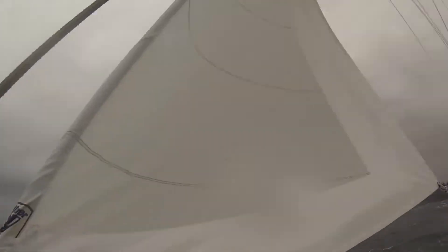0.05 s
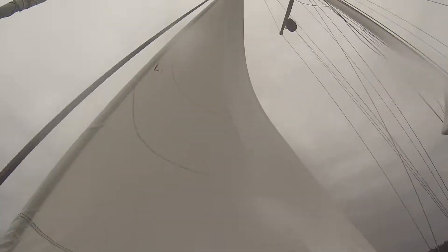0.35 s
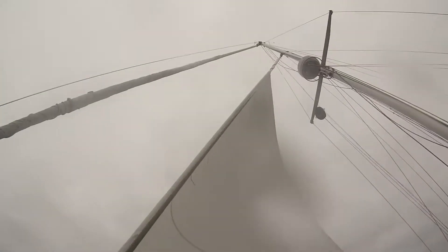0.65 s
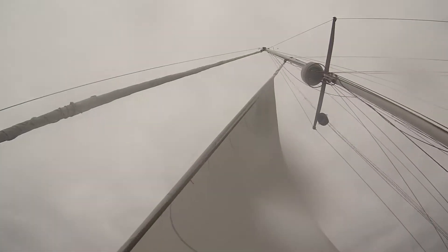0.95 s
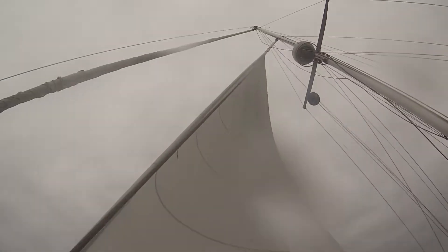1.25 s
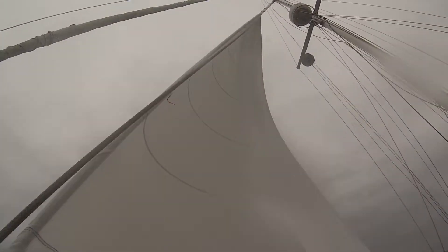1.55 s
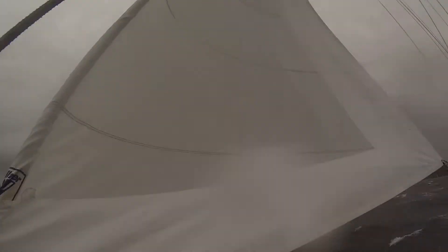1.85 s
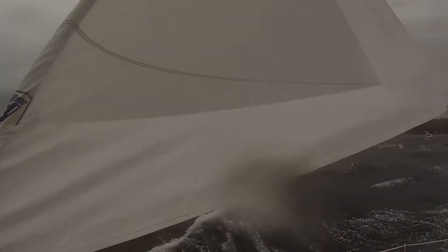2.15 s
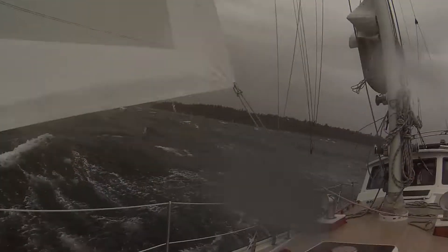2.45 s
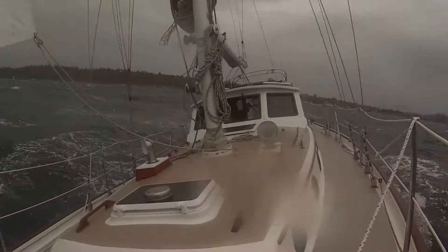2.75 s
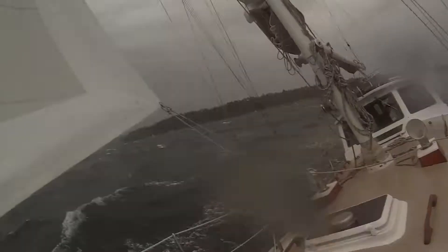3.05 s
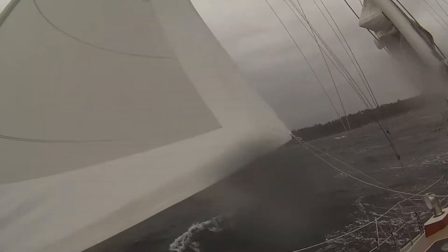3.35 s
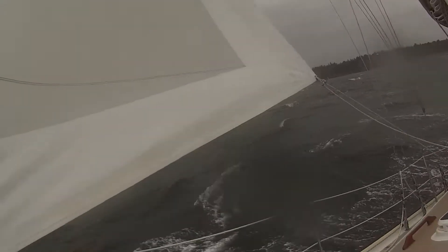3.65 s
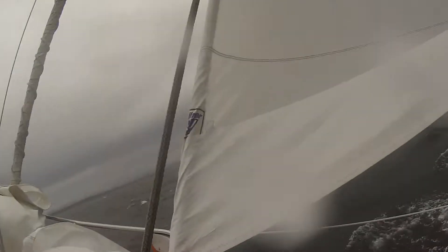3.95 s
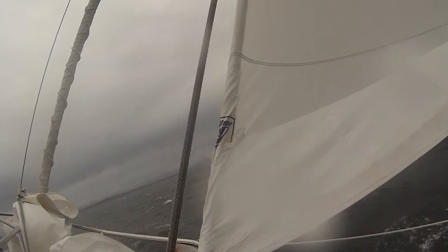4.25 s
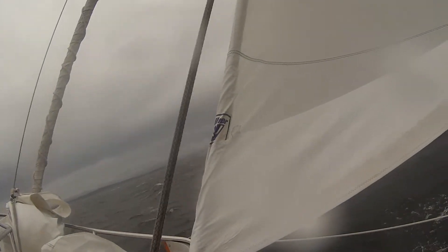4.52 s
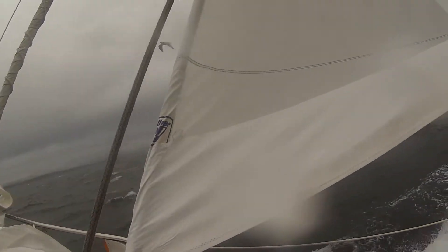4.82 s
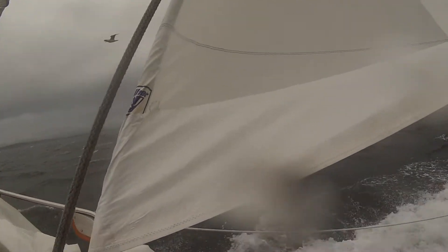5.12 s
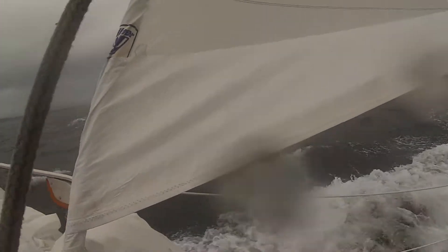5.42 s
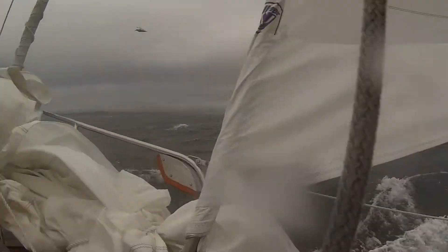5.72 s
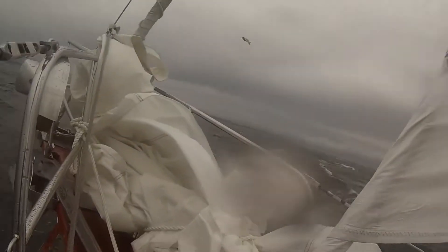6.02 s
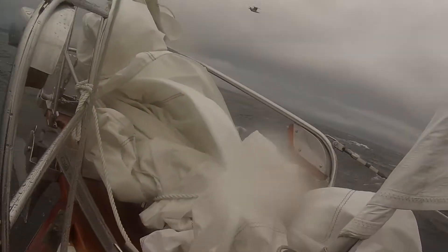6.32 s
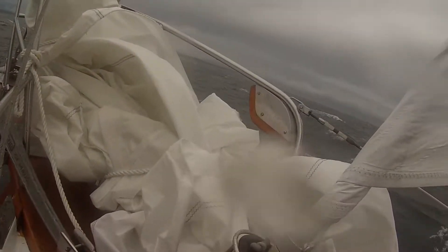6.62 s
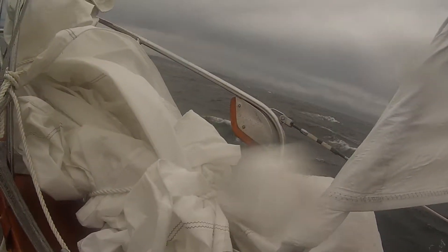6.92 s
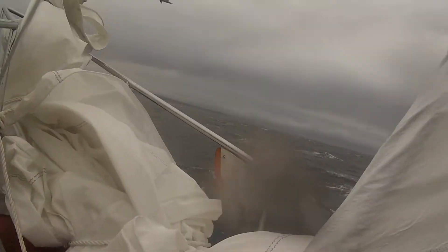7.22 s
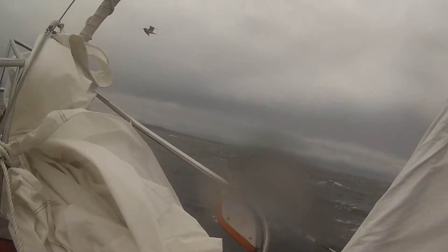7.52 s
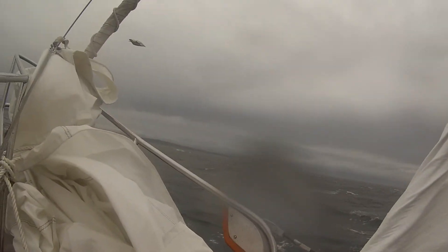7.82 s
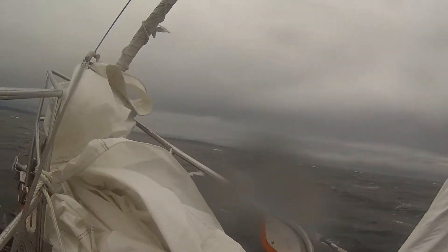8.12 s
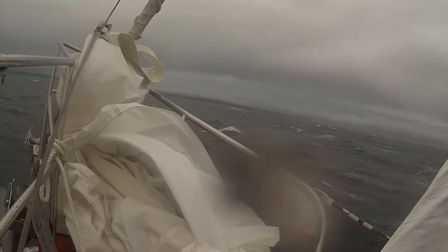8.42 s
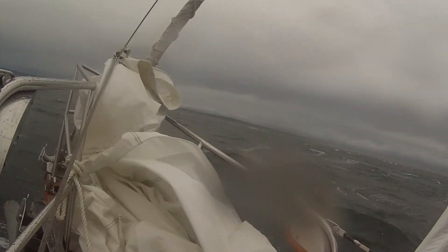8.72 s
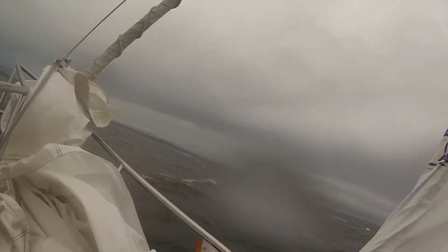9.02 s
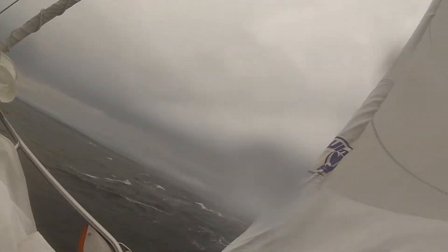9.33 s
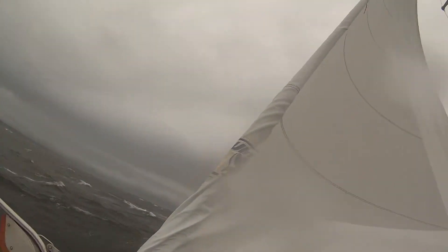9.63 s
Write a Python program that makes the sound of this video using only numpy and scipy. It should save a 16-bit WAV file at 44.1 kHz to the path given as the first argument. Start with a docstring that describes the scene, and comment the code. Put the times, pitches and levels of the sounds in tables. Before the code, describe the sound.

Strong wind buffets and booms on a small microphone aboard a sailing boat, with faint water wash and ticks of spray.

```python
"""Strong wind batters a small camera in a waterproof case on the foredeck of a sailing boat.
Eddies rock, thump and hiss along the case, and its edges whistle as they cut the air.
Behind the wind, the bow wave washes along the hull and drops of spray tick on the plastic shell.
Everything is heard through the case, which booms in the bass and rings hollow in the treble."""
import sys
import numpy as np
from scipy import signal
from scipy.fft import rfft, irfft, next_fast_len
from scipy.io import wavfile
from scipy.ndimage import uniform_filter1d

SR = 44100
rng = np.random.default_rng(int(sys.argv[2]) if len(sys.argv) > 2 else 0)


def output_pcm(signal):
    """Save a mono or channel-first signal as 16-bit PCM at the path in sys.argv[1].

    Samples are clipped to [-1, 1] before scaling.
    """
    pcm = np.clip(np.atleast_2d(signal).T, -1, 1) * 32767
    wavfile.write(sys.argv[1], SR, np.round(pcm).astype(np.int16))


N = 430857
TIME = np.arange(N) / SR


def undb(db):
    """Decibels to gain."""
    return np.exp(np.asarray(db) * (np.log(10) / 20))


def unit(x):
    """Scale to an rms of one."""
    return x / np.sqrt(np.mean(x ** 2))


def fader(points):
    """A level curve in dB, drawn in straight lines between (seconds, dB) points."""
    return np.interp(TIME, *np.transpose(points))


def walk(rate):
    """A smooth random wander with an rms of one and about `rate` turns a second."""
    size = int(SR / rate)
    held = rng.standard_normal(N // 50)[np.arange(N) // size]
    return unit(uniform_filter1d(held, size))


def even(x, span_s):
    """Hold a noise to a constant strength over the given span."""
    return x / np.sqrt(uniform_filter1d(x ** 2, int(span_s * SR)) + 1e-9)


def add(out, start, sound):
    """Mix a sound in at a start time in seconds."""
    i = max(int(start * SR), 0)
    out[i:i + len(sound)] += sound[:N - i]


def swells(rows, rise_s, fall_s):
    """Summed power of swells (start, length, dB) that rise, hold and die away."""
    power = np.zeros(N)
    for start, length, db in rows:
        t = TIME[:int((length + 1) * SR)]
        attack = np.minimum(t / rise_s, 1)
        release = np.exp(-np.maximum(t - length, 0) / fall_s)
        add(power, start, (undb(db) * attack * release) ** 2)
    return power


def colour_db(colour, hz):
    """An EQ curve read at any frequencies, rolling off 30 dB per octave past its ends."""
    points_hz, db = np.transpose(colour)
    octave, known = np.log2(np.maximum(hz, 1)), np.log2(points_hz)
    return np.interp(octave, known, db) - 30 * abs(octave - np.clip(octave, known[0], known[-1]))


# The hollow ring of the case. Each row: centre in Hz, width in Hz, boost in dB.
CASE_RESONANCES = [(747, 82, 2), (1534, 300, 7), (2017, 550, 5), (3006, 55, 6), (3420, 130, 3.5),
                   (5560, 410, 3), (6670, 290, 3), (7400, 120, 4), (11470, 680, 2.5)]
def case_db(hz):
    """How much the resonances of the case lift each frequency."""
    return sum(db / (1 + (2 * (hz - centre) / width) ** 2) for centre, width, db in CASE_RESONANCES)


def noise(colour):
    """Noise of a given colour, heard through the case."""
    size = next_fast_len(N, real=True)
    hz = np.arange(size // 2 + 1) * SR / size
    eq = undb(colour_db(colour, hz) + case_db(hz))
    return unit(irfft(rfft(rng.standard_normal(size)) * eq, size)[:N])


# The bright tone of a splash. Each row: frequency in Hz, relative level in dB.
SPLASH_COLOUR = [(900, -49), (1500, -6.5), (2400, -0.5), (3050, -24), (3500, 1), (3900, -1), (4400, -2.5),
                 (5000, 0), (5900, -5.5), (6400, -3), (7300, -4), (8400, -6), (10200, -12), (11200, -14.5),
                 (12400, -18), (13600, -16), (15500, -36)]
def splash(ping_hz, width_hz, lift_db, fade_s=0.011, size=512):
    """A drop bursts on the case: a sharp click with one ping and its own random ripples of tone."""
    hz = np.arange(size // 2 + 1) * SR / size
    jitter = rng.standard_normal(len(hz))
    ripple_db = 3 * unit(uniform_filter1d(uniform_filter1d(jitter, size=7), size=5))
    ping_db = lift_db / (1 + (2 * (hz - ping_hz) / width_hz) ** 2)
    dull_db = 7 * np.log2(np.maximum(hz / (1.7 * ping_hz), 1))  # larger, lower drops carry less treble
    eq = undb(colour_db(SPLASH_COLOUR, hz) + case_db(hz) + ripple_db + ping_db - dull_db)
    cepstrum = irfft(np.log(eq))
    pulse = irfft(np.exp(rfft(2 * cepstrum[:size // 2], size)))  # minimum phase: the tightest attack
    return pulse / abs(pulse).max() * np.exp(-(TIME[:size] / fade_s) ** 2)


def mist(hiss_gain, count=36):
    """Fine droplets tick faintly and high at random moments, more strongly in the gusts."""
    out = np.zeros(N)
    for when, size in rng.random((count, 2)):
        strength = np.sqrt(hiss_gain[int(when * N)]) * undb(-31 + 10 * size ** 2)
        add(out, when * N / SR, strength * splash(ping_hz=11500, width_hz=3000, lift_db=21))
    return out


# The foamy tone of the wash. Each row: frequency in Hz, relative level in dB.
FOAM_COLOUR = [(400, -5), (900, -18), (1250, -15.5), (1530, -3), (1820, -21), (2220, -5), (3000, -20.5),
               (3600, -14), (4080, -17), (4950, -15), (5850, -24.5), (6330, -16), (6900, -24),
               (7350, -20.5), (8600, -27), (9300, -26.5), (10100, -32.5), (11200, -31.5), (15000, -45)]
# Waves washing along the hull. Each row: start in seconds, length in seconds, level in dB.
WAVES = [(.62, 0.77, -39.5), (4.53, 0.22, -45), (4.68, 0.65, -48.5), (5.85, 0.75, -49.5)]
def bow_wave(churn_db=-53.5, note_hz=1468, width_hz=167, drift_hz=22):
    """The bow wave churns steadily and swells as the boat meets each wave; its hollow note wavers."""
    strength = np.sqrt(undb(churn_db) ** 2 + swells(WAVES, rise_s=0.17, fall_s=0.16))
    lowpass = signal.butter(2, width_hz / 2, fs=SR, output="sos")
    slow_noise = signal.sosfilt(lowpass, rng.standard_normal((2, N)))
    phase = 2 * np.pi * np.cumsum(note_hz + drift_hz * walk(rate=11)) / SR
    band = slow_noise[0] * np.cos(phase) + slow_noise[1] * np.sin(phase)
    note = unit(band * undb(0.8 * walk(rate=8.8)))
    wash = undb(-1.5) * noise(FOAM_COLOUR) + undb(-5.5) * note
    return wash * strength * undb(walk(rate=30))


# The plastic tick of the shell. Each row: multiple of the ring pitch, relative level in dB,
# seconds to fall by 60 dB.
SHELL_MODES = [(.87, 9, 0.0081), (1.0, 16, 0.0065), (1.12, -11, 0.024), (1.22, 11, 0.0095),
               (1.85, -9, 0.005), (2.36, -9, 0.011), (2.62, -7, 0.023)]
def shell_ring(ring_hz):
    """The struck shell rings briefly; neighbouring modes swing opposite ways, softening the attack."""
    t = TIME[:SR // 20]
    scatter_db = rng.standard_normal(len(SHELL_MODES))  # each spot favours other modes
    ring = np.zeros(len(t))
    for k, (ratio, db, t60) in enumerate(SHELL_MODES):
        mode = np.sin(2 * np.pi * ring_hz * ratio * t) * np.exp(-np.log(1000) * t / t60)
        ring += (-1) ** k * undb(db + scatter_db[k]) * mode
    return ring / abs(ring).max()


# Drops hitting the shell. Each row: start in seconds, splash level in dB, ping pitch in Hz,
# ping boost in dB, ring level in dB, ring pitch in Hz.
DROPS = [(0.5374, -12, 11800, 8, -11, 1800), (0.617, -21, 5040, 14, -16.5, 1980),
         (0.8613, -18.5, 11000, 14, -25, 2000), (1.5376, -17, 4960, 11, -21, 2150),
         (2.7862, -26, 4220, 13, -28.5, 1850), (2.858, -36, 4400, 16, -37, 1900),
         (2.946, -31, 5000, 4, -30, 1920), (3, -30.5, 5200, 8, -40, 1900),
         (3.055, -18.5, 4260, 2, -39, 1700), (3.19, -38, 5000, 8, -48, 1900),
         (3.417, -51, 5000, 10, -40, 1740), (4.0354, -12.5, 7900, 7.5, -15.5, 2070),
         (5.867, -21.5, 2410, 22, -12, 1260), (5.869, -36, 3300, 8, -13.5, 2010),
         (6.397, -16, 4950, 17, -4, 1860), (6.679, -28, 4900, 10, -35, 2000),
         (6.9008, -20, 7800, 8, -33, 1880), (7.4555, -26, 3640, 10, -36, 1890),
         (7.5053, -23, 7400, 5, -28, 1880), (7.9794, -18, 5300, 5, -23, 1980),
         (8.082, -33, 11400, 5, -42, 1900), (8.2138, -18.5, 11000, 14, -39, 1750),
         (8.3556, -28, 5100, 9, -23, 1930), (8.7571, -25, 11200, 19, -26, 1850),
         (9.0553, -30, 11700, 2, -30, 1900), (9.622, -13.5, 5000, 10, -18.5, 1950)]
def spray():
    """Each drop splashes sharply and rings the shell at a pitch set by where it lands."""
    out = np.zeros(N)
    for start, splash_db, ping_hz, ping_db, ring_db, ring_hz in DROPS:
        drop = undb(ring_db) * shell_ring(ring_hz)
        add(drop, 0, undb(splash_db) * splash(ping_hz, width_hz=0.13 * ping_hz, lift_db=ping_db))
        # the small stiff shell radiates little below its ring
        low_cut = signal.butter(5, 0.66 * ring_hz, "high", fs=SR, output="sos")
        add(out, start, signal.sosfilt(low_cut, drop))
    return out


# Air resonances of the case. Each row: pitch in Hz, width in Hz, relative level in dB.
WHISTLE_MODES = [(2370, 690, 2), (4350, 290, -13.5), (4900, 510, -7.5), (5500, 400, -22), (6340, 450, -16),
                 (7330, 520, -24), (8240, 700, -25)]
# Spells when an edge cuts the wind. Each row: start in seconds, length in seconds,
# whistle level in dB, whistle tilt in dB per octave, hiss level in dB.
EDGE_SPELLS = [(0, 0.17, -36, 3, -50), (0.161, 0.17, -42, -0.5, -47.5), (0.328, 0.14, -45.5, -4, -50),
               (0.452, 0.093, -41.5, -1, -43), (0.543, 0.21, -41.5, 2, -35.5),
               (0.764, 0.88, -48, -1.5, -54), (1.094, 0.37, -44.5, 2, -36.5), (1.487, 0.12, -41, 0, -45),
               (9.085, 0.22, -51, -1, -54), (9.185, 0.11, -46.5, 3, -55), (9.29, 0.17, -56, -1, -52),
               (9.29, 0.28, -56, 8, -64)]
EDGE_RISE_S, EDGE_FALL_S = 0.052, 0.012
def whistle(pivot_hz=4900, wander_db=0.5):
    """Hollow whistles come up when the case turns its edge to the wind; each wavers on its own."""
    out = np.zeros(N)
    for hz, width, mode_db in WHISTLE_MODES:
        band = signal.iirpeak(hz, hz / width, fs=SR)
        tone = unit(signal.lfilter(*band, signal.lfilter(*band, rng.standard_normal(N))))
        octaves = np.log2(hz / pivot_hz)
        spells = [(start, length, db + tilt * octaves) for start, length, db, tilt, _ in EDGE_SPELLS]
        strength = np.sqrt(swells(spells, EDGE_RISE_S, EDGE_FALL_S))
        out += tone * strength * undb(mode_db + wander_db * walk(rate=36))
    return out


# The sub-bass weight of the wind. Each row: frequency in Hz, relative level in dB.
RUMBLE_COLOUR = [(17, -6), (25, -10.5), (35, -5), (47, 1.5), (55, -6), (67, -12), (88, -24.5), (150, -47)]
# The depth of the wind's slow pressure swings. Each row: time in seconds, level in dB.
RUMBLE_FADER = [(0, -29), (1.2, -33), (1.4, -43), (1.68, -33), (1.8, -19.5), (2.45, -29.5), (3.15, -25),
                (3.35, -32.5), (3.6, -28.5), (4.2, -24.5), (5.1, -27), (6.1, -30.5), (9.3, -33),
                (9.77, -20)]
# The low boom of the case. Each row: frequency in Hz, relative level in dB.
BOOM_COLOUR = [(32, -28), (43, -2), (48, 2.5), (54, -6.5), (68, -24.5)]
# Large eddies rolling past. Each row: time of the peak in seconds, level in dB.
SURGES = [(.18, -16.5), (1.18, -24.5), (1.86, -16), (1.925, -14), (2.06, -22), (2.27, -20), (2.65, -26),
          (2.9, -25), (3.2, -21), (3.67, -18), (3.88, -21), (3.98, -18), (4.2, -21.5), (4.86, -17),
          (5.405, -17), (5.58, -18.5), (5.77, -21), (6.45, -29), (6.7, -22), (6.92, -24), (7.82, -24),
          (8.22, -25.5)]
def rumble(wander_db=3.5, surge_width_s=0.03):
    """Eddies rock the case; the largest make it boom for a few cycles at its low resonance."""
    swing = undb(fader(RUMBLE_FADER) + wander_db * walk(rate=16))
    rocking = even(noise(RUMBLE_COLOUR), span_s=0.058) * swing
    surge_power = sum(undb(db) ** 2 * np.exp(-((TIME - peak) / surge_width_s) ** 2)
                      for peak, db in SURGES)
    boom = even(noise(BOOM_COLOUR), span_s=0.041) * np.sqrt(surge_power)
    return rocking + boom


# Single hard thumps of air. Each row: start in seconds, level in dB, decay time in seconds,
# puff trim in dB on top of that level.
SLAMS = [(0.137, -17.5, 0.017, -19), (2.987, -24, 0.011, -13), (3.05, -30, 0.013, -5),
         (3.82, -23, 0.016, -17.5), (3.929, -18.5, 0.0082, -23), (3.994, -26.5, 0.006, -3.5),
         (4.165, -28.5, 0.017, -11.5), (4.84, -29.5, 0.018, -11), (5.069, -33, 0.015, -9),
         (5.304, -25, 0.02, -11.5), (5.342, -30, 0.0048, -12), (5.389, -26, 0.014, -10.5),
         (5.586, -30, 0.022, -6.5), (5.775, -33, 0.013, -6), (6.603, -13.5, 0.0053, -12),
         (6.896, -27, 0.012, -11), (9.013, -29.5, 0.011, -0.5), (9.358, -29, 0.013, -18)]
def slams(rise_s=0.0032):
    """An eddy hits the case square on: a boom with a short rough puff."""
    boom_gain, puff_gain, t = np.zeros(N), np.zeros(N), TIME[:SR // 4]
    for start, db, decay_s, puff_db in SLAMS:
        envelope = undb(db) * (1 - np.exp(-t / rise_s)) * np.exp(-t / decay_s)
        add(boom_gain, start, envelope)
        add(puff_gain, start, undb(puff_db) * envelope)
    sub = undb(8) * even(noise(RUMBLE_COLOUR), span_s=0.0059)
    body = undb(1.5) * even(noise(BUFFET_COLOUR), span_s=0.02)
    puff = undb(-1) * noise(FLUTTER_COLOUR) + noise(HISS_COLOUR)
    return boom_gain * (sub + body) + puff_gain * puff


# The strength of the wind at the case. Each row: time in seconds, level in dB.
WIND_FADER = [(0, -22.5), (.15, -44), (.19, -48), (.45, -34), (1.45, -35.5), (1.68, -45), (2.4, -45),
              (3.0, -43), (3.3, -48.5), (4.4, -49.5), (5.5, -45.5), (5.73, -48), (5.8, -35), (5.96, -32.5),
              (6.2, -31), (6.5, -32.5), (6.95, -34.5), (7.9, -31.5), (8.1, -30), (8.28, -36.5),
              (8.38, -31.5), (8.55, -36), (8.86, -40), (8.93, -32), (9.28, -34.5), (9.33, -45),
              (9.45, -49.5), (9.77, -47)]
# Gusts tearing across the case. Each row: start in seconds, length in seconds,
# buffet level in dB, flutter level in dB.
GUSTS = [(0, 0.041, -21, -31), (0.052, 0.097, -24.5, -38), (0.149, 0.17, -27.5, -44.5),
         (0.637, 0.85, -53, -38), (1.68, 0.55, -38, -59.5), (2.558, 0.066, -42.5, -53),
         (2.88, 0.11, -36, -55), (3.016, 0.057, -33, -49.5), (3.83, 0.19, -36.5, -56),
         (3.883, 0.1, -43, -47), (5.277, 0.099, -36.5, -53.5), (5.526, 0.18, -31.5, -49),
         (5.739, 0.1, -26.5, -41), (5.958, 0.14, -31, -54), (6.12, 0.056, -48, -40),
         (7.993, 0.12, -32, -50), (8.33, 0.071, -42, -56)]
def airflow(rise_s=0.03, fall_s=0.04):
    """Gains for buffet, flutter and hiss: the running wind plus gusts and the air split by an edge."""
    wind_db = fader(WIND_FADER)
    gust_low = swells([(start, length, db) for start, length, db, _ in GUSTS], rise_s, fall_s)
    gust_high = swells([(start, length, db) for start, length, _, db in GUSTS], rise_s, fall_s)
    edge = swells([(start, length, db) for start, length, _, _, db in EDGE_SPELLS],
                  EDGE_RISE_S, EDGE_FALL_S)
    buffet_gain = np.sqrt(undb(wind_db) ** 2 + gust_low)
    flutter_gain = np.sqrt(undb(0.68 * wind_db - 21) ** 2 + gust_high)  # grows slower than the wind
    hiss_gain = np.sqrt(undb(wind_db - 7) ** 2 + undb(1.5) ** 2 * gust_high + edge)
    return buffet_gain, flutter_gain, hiss_gain


# The wind's bassy buffet, midrange flutter and top hiss. Each row: frequency in Hz, relative level in dB.
BUFFET_COLOUR = [(45, -39), (70, 0), (100, 2.5), (140, -2), (210, -5.5), (320, -14), (500, -24.5),
                 (1000, -73)]
FLUTTER_COLOUR = [(150, 0.5), (300, 3.5), (450, 1), (700, -4), (900, -8), (1200, -6.5), (2000, -42)]
HISS_COLOUR = [(530, -25), (900, -20.5), (1250, -6), (1490, -2.5), (1800, -10), (2360, 0.5), (3210, -12.5),
               (3920, -13.5), (4900, -13.5), (5910, -21.5), (6750, -18), (7480, -23.5), (10000, -37.5),
               (11800, -38.5), (15000, -49)]
def wind(buffet_gain, flutter_gain, hiss_gain):
    """Small eddies buffet, flutter and hiss; the same turbulence shakes all three."""
    eddies = walk(rate=60)
    buffet = even(noise(BUFFET_COLOUR) * undb(0.73 * eddies), span_s=0.15) * buffet_gain
    flutter = noise(FLUTTER_COLOUR) * unit(undb(0.98 * eddies + 1.7 * walk(rate=170))) * flutter_gain
    hiss = noise(HISS_COLOUR) * unit(undb(1.32 * eddies + 0.9 * walk(rate=380))) * hiss_gain
    return (buffet + flutter + hiss) * undb(0.5 * walk(rate=10))


def scene():
    """Wind up front, sea and spray behind it, in mono."""
    buffet_gain, flutter_gain, hiss_gain = airflow()
    air = rumble() + wind(buffet_gain, flutter_gain, hiss_gain) + whistle() + slams()
    water = bow_wave() + spray() + mist(hiss_gain)
    return (air + water)[None]


def record(dry, top_hz=15300):
    """The camera cuts the top end steeply."""
    return signal.sosfilt(signal.ellip(8, 0.2, 70, top_hz, fs=SR, output="sos"), dry)


dry = scene()
out = record(dry)
output_pcm(out)
```